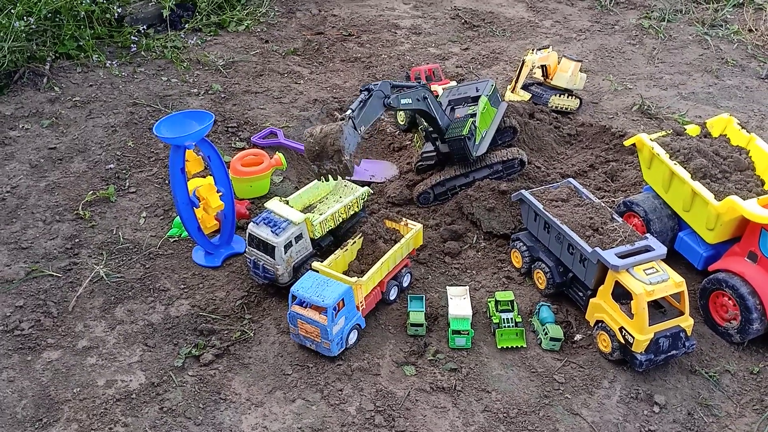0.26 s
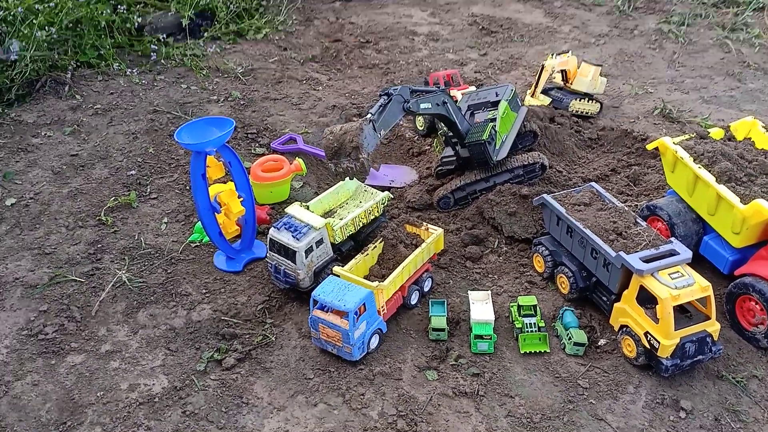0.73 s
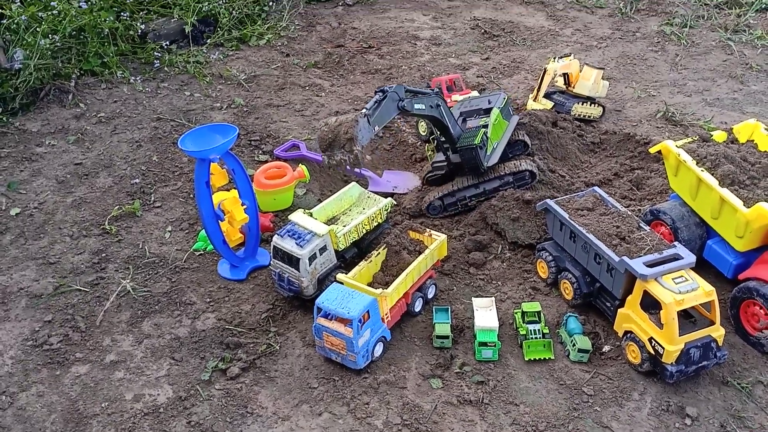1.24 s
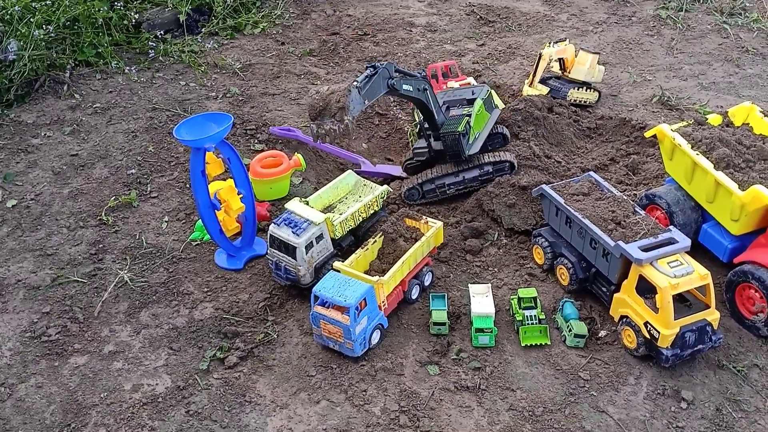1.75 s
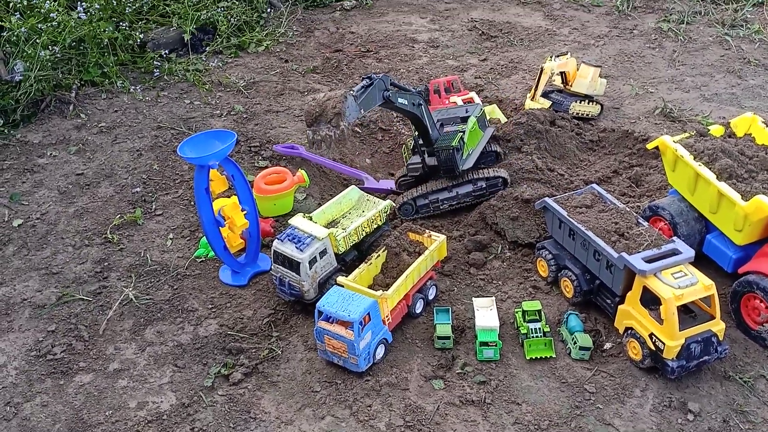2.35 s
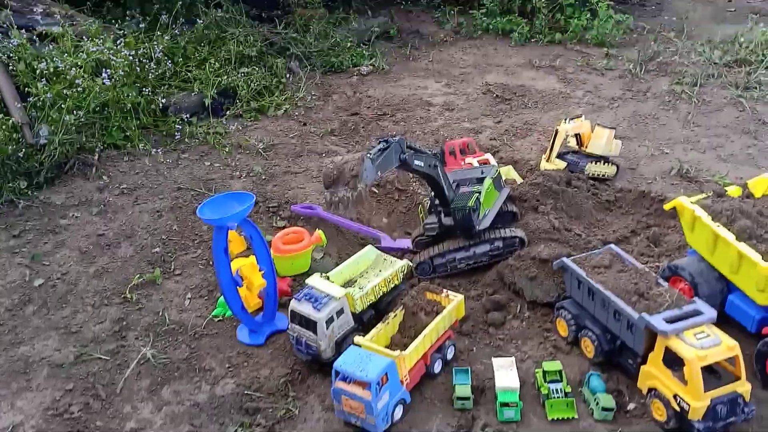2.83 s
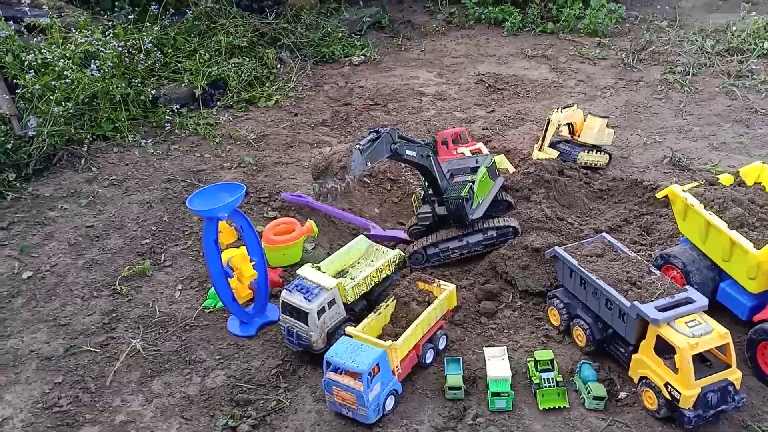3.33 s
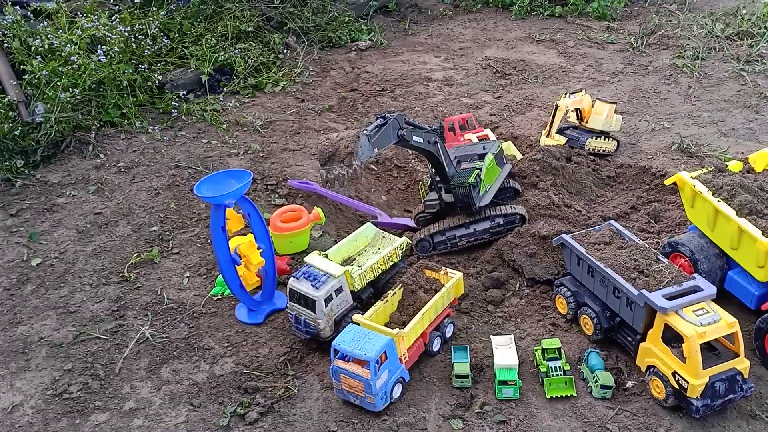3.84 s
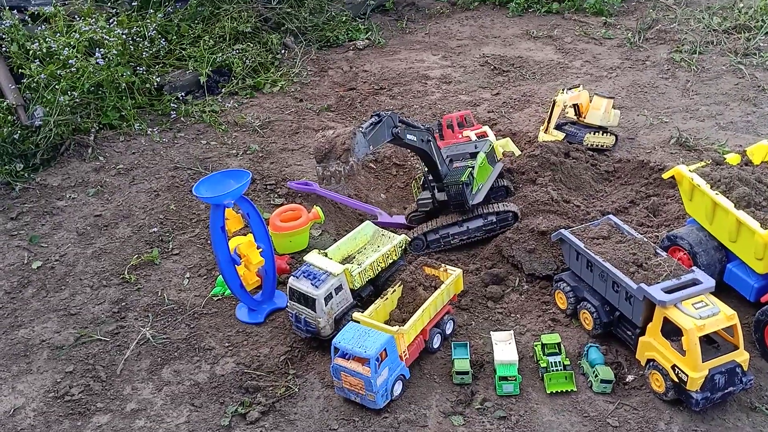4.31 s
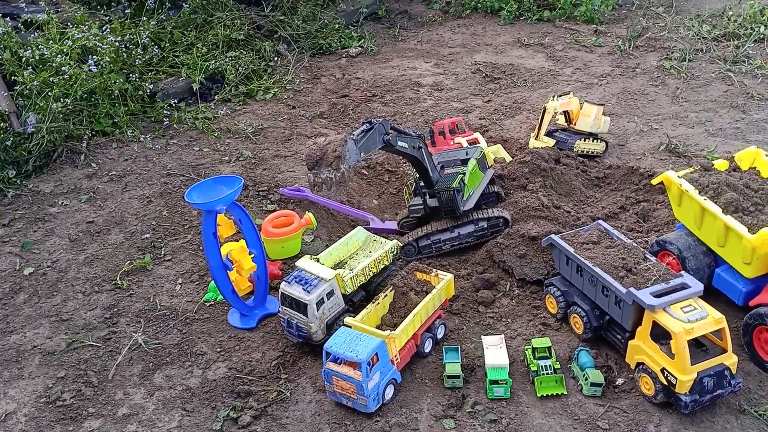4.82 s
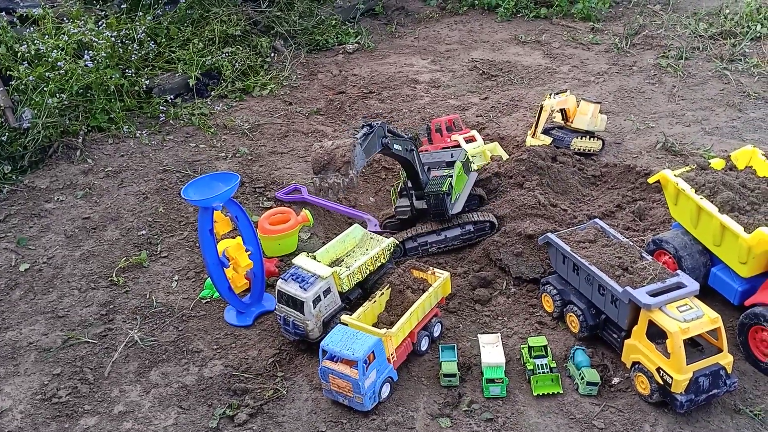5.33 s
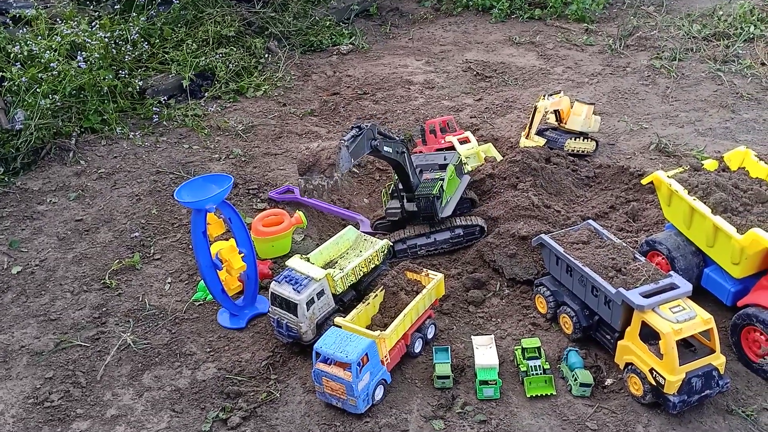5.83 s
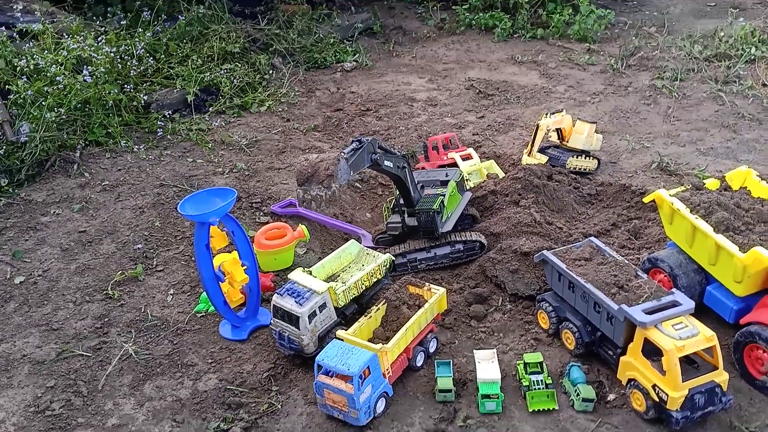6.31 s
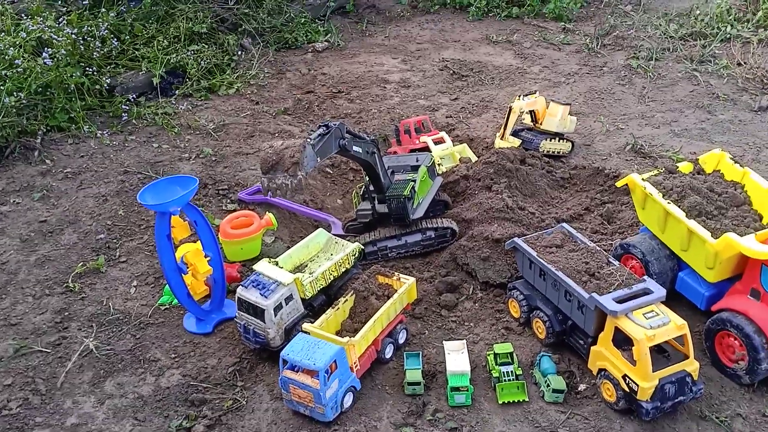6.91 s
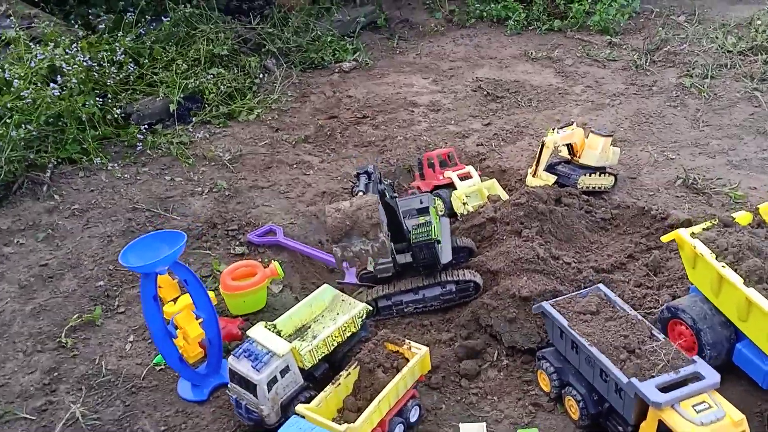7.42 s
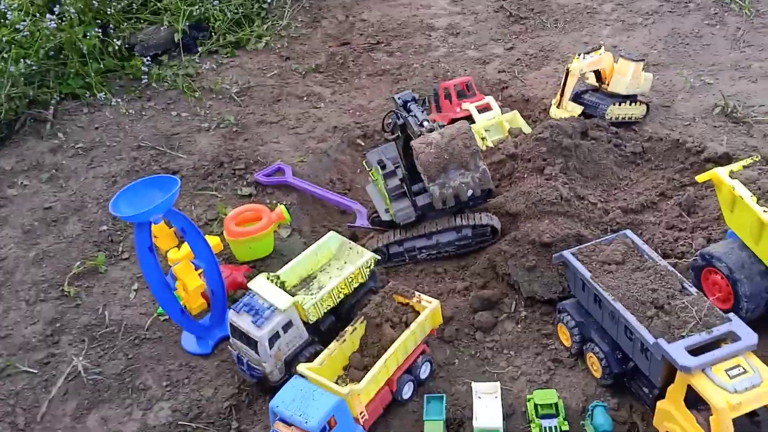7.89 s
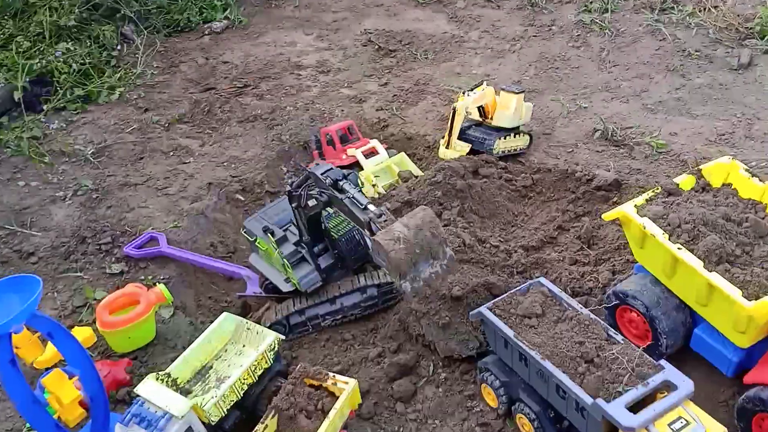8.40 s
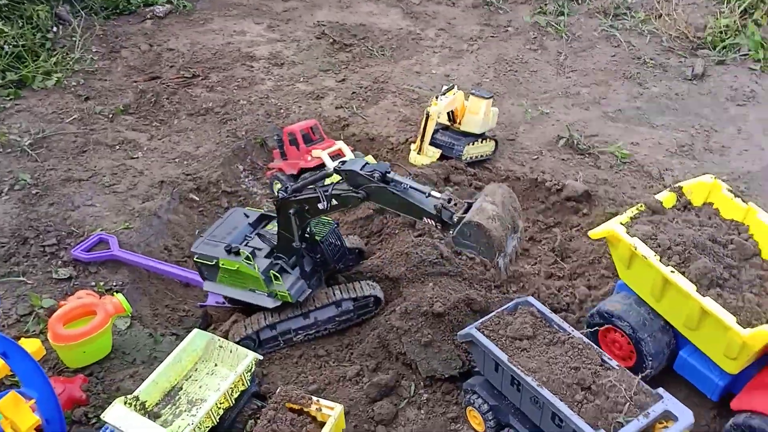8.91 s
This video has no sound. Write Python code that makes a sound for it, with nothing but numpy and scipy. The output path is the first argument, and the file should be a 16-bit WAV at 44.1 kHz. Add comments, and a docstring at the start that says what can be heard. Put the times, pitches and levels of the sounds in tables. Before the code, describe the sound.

Small electric motors with rattling plastic gears start and stop: a coarse grind winding down, several brief whirrs, a pause, then a longer grinding turn. The handheld stereo microphones pick up much louder, close thumps, raps, dry clicks and gritty finger rubs, stronger on the right. Behind it lie open air, thin high insect hiss, distant rumble and one very faint trickle of dirt.

```python
"""A toy excavator works in a dirt patch a few metres from two microphones in a hand-held plastic case.
Its small motors spin up and coast down: gear teeth whine at steady multiples of the motor speed, and
noise bursts that recur each shaft turn rattle the plastic housings; swelling noise makes one hard gear grind.
Dirt trickles as filtered noise. Fingers knock, click, scrape and rub on the case, loudest on the right: short
pushes ring its modes, grit adds noise. Insects hiss in two noise bands over airy hiss and a far rumble."""
import sys
import numpy as np
from scipy import signal
from scipy.fft import rfft, irfft
from scipy.io import wavfile
from scipy.ndimage import uniform_filter1d

SR = 44100
rng = np.random.default_rng(int(sys.argv[2]) if len(sys.argv) > 2 else 0)


def file_out(sig):
    """Save sig as 16-bit WAV at sys.argv[1]."""
    # one column per channel
    cols = np.atleast_2d(sig).T
    # limit, then scale
    lim = np.clip(cols, -1, 1)
    pcm = np.round(lim * 32767).astype(np.int16)
    wavfile.write(sys.argv[1], SR, pcm)


def elevation(decibels):
    """Turn decibel levels (scalar or array-like) into linear amplitude ratios."""
    levels = np.asarray(decibels, float)
    return 10 ** (levels / 20)


N = 403515
T = np.arange(N) / SR  # seconds
HZ = np.maximum(np.arange(N // 2 + 1) * SR / N, 1)  # frequency of each spectrum bin
SIDES = np.array([[1], [-1]])  # left, right


def colour(x, points, share=1):
    """Filter by a spectrum of (Hz, dB) points, joined on a log frequency axis."""
    hz, db = np.transpose(points)
    gain_db = np.interp(np.log(HZ), np.log(hz), db)
    return irfft(rfft(x) * elevation(share * gain_db), N)


def hump(hz, width):
    """Gain of a resonance over the spectrum, 1 at its centre."""
    return 1 / np.sqrt(1 + (2 * (HZ - hz) / width) ** 2)


def unit(x):
    """Scale to rms 1."""
    return x / np.sqrt(np.mean(x ** 2))


def walk(rate):
    """Random drift: levels held 1 / rate seconds, smoothed twice, rms 1."""
    hold = int(SR / rate)
    steps = np.repeat(rng.standard_normal(N // hold + 1), hold)
    smooth = uniform_filter1d(uniform_filter1d(steps, hold), hold)
    return unit(smooth[:N])


def hiss(alike):
    """Noise for two microphones; alike is the correlation between them."""
    mid, side = rng.standard_normal((2, N))
    return np.sqrt(1 + alike) * mid + SIDES * np.sqrt(1 - alike) * side


def curves(runs):
    """Join the runs in time; the first curve is 1 during a run and fades to 0 between them."""
    s, *columns = np.transpose(np.concatenate(runs))
    on = sum((T >= run[0][0]) & (T < run[-1][0]) for run in runs)
    gate = uniform_filter1d(1. * on, size=300, mode="nearest")
    return [gate] + [np.interp(T, s, column) for column in columns]


def ring(x, hz, t60):
    """One mode that decays 60 dB in t60 seconds, driven by x."""
    pole = np.exp(2j * np.pi * hz / SR - np.log(1000) / (t60 * SR))
    return signal.lfilter([1], [1, -pole], x).imag


def motor(runs):
    """Speed climbs towards its top under power, then friction brakes it evenly; also the run's level."""
    s, powered, top, rise, brake, db = np.array(runs).T[:, :, None]
    climb = top * (1 - np.exp(-np.clip(T - s, 0, powered) / rise))
    speeds = climb - brake * np.maximum(T - s - powered, 0)
    level_db = db[np.argmax(speeds, axis=0), 0]
    return np.maximum(np.max(speeds, axis=0), 0), uniform_filter1d(level_db, size=400)


def whine(hz, tones, waver, flutter_db):
    """Shaft and gear tones, locked to a slightly unsteady speed; each flutters alone in level."""
    turns = np.cumsum(hz * (1 + waver * walk(60))) / SR
    total = 0
    for multiple, db in tones:
        level = np.sqrt(2) * elevation(db + flutter_db * walk(40))
        total = total + level * np.sin(2 * np.pi * multiple * turns)
    return total


# Resonances of the housing panels.
# Each row: centre in Hz, width in Hz, boost (or cut, if negative) in dB at the centre.
PANEL_MODES = [(253, 54, 12), (1210, 340, -3), (2880, 130, 3), (6800, 430, -3)]


def panels(x):
    """Spectrum of x after the housing panels boost or cut what falls on their resonances."""
    gains = [1 + (elevation(db) - 1) * hump(hz, width) ** 2 for hz, width, db in PANEL_MODES]
    return rfft(x) * np.prod(gains, axis=0)


def rattle(shaft_hz, box, beat, grain_db, treble_gain):
    """Teeth clatter in uneven bursts, harder once a shaft turn; recurring flaws draw rough partials."""
    repeat_share, repeat_memory = .45, .94  # power share that recurs; how much of a flaw lasts a turn
    turns = np.cumsum(shaft_hz * (1 + .004 * walk(40))) / SR
    # one row of flaws per turn, each row mostly a copy of the one before
    flaws = rng.standard_normal((int(turns[-1]) + 1, 512))
    flaws = unit(signal.lfilter([1], [1, -repeat_memory], flaws, axis=0))
    again = flaws.ravel()[(turns * flaws.shape[1]).astype(int)]
    blows = np.sqrt(1 - repeat_share) * hiss(0.13) + np.sqrt(2 * repeat_share) * again
    blows = blows * elevation(grain_db * walk(500)) * (1 + beat * np.cos(2 * np.pi * turns))
    spectrum = panels(colour(blows, box))
    body = irfft(spectrum * (HZ < 3600), N)
    treble = irfft(spectrum * (HZ >= 3600), N)
    # rms 1 while the shaft turns, before the treble gain
    running = (body + treble)[:, shaft_hz > 100]
    return (body + treble * treble_gain) / np.sqrt(np.mean(running ** 2))


# Tones of the arm drives. Each row: multiple of the tooth rate, relative level in dB.
ARM_GEAR_TONES = [(.1, -6), (.285, -16), (.46, -11), (.615, -10), (1, -4), (1.6, -17), (2, -12), (3, -15)]
# Spectrum of the arm housing. Each row: frequency in Hz, relative level in dB per Hz.
ARM_HOUSING = [(300, -35.5), (850, -18.5), (1150, -6), (2830, -5), (4460, -14), (6920, -9), (8430, -26),
               (9230, -43.5), (15000, -41.5)]


def arm(runs, whine_db):
    """A ten-tooth pinion drives the reduction gears; faster is louder and brighter."""
    hz, db = motor(runs)
    pace = hz / 2400
    tones = whine(hz, ARM_GEAR_TONES, .007, 3)
    tones = elevation(db + whine_db) * np.clip(1.3 * pace - .2, 0, 1) * tones
    # the small housing radiates low tones poorly and muffles high ones
    tones = colour(tones, [(600, -26), (1300, 0), (3200, 0), (4500, -6.5)])
    tones = irfft(panels(tones), N)
    clatter = rattle(hz / 10, ARM_HOUSING, 0.12, 1.1, pace ** .5)
    return tones + elevation(db) * pace ** 1.045 * clatter


# Runs of the stick motor; the first row is another motor, already running, that soon coasts down.
# Each row: start in seconds, powered time in seconds, top speed in pinion teeth per second,
# spin-up time in seconds, braking in Hz per second, relative level in dB.
FIRST_MOTOR_AND_STICK_RUNS = [(-.3, 0.53, 2285, 0.046, 6955, -49), (.918, 0.24, 2406, 0.051, 9797, -40.5),
                              (1.36, 0.28, 2254, 0.047, 9723, -40), (1.745, .213, 2688, .078, 9690, -40),
                              (4.905, 0.36, 2449, 0.072, 11040, -43)]


def first_motor_and_stick():
    """Another motor coasts down, then the stick motor whines and clatters in short runs."""
    return arm(FIRST_MOTOR_AND_STICK_RUNS, 0.34)


# Runs of the boom motor. Each row: start in seconds, powered time in seconds, top speed in pinion teeth
# per second, spin-up time in seconds, braking in Hz per second, relative level in dB.
BOOM_RUNS = [(3.157, 0.15, 2350, 0.035, 15180, -43.5), (3.998, .16, 2507, 0.03, 12440, -44.5),
             (4.815, .41, 2162, .024, 13890, -44), (5.737, 0.26, 2500, 0.031, 13520, -41.5)]


def boom():
    """The boom motor drives the same kind of gears, with less whine against its clatter."""
    return arm(BOOM_RUNS, -2.0)


# Hum of the slewing motor, a list of rows per run.
# Each row: time in seconds, shaft speed in Hz, relative level in dB.
SLEW_HUM = [
    [(0, 284.3, -61), (.2, 278.8, -59), (.33, 229, -71)],
    [(6.95, 235, -73.5), (7.3, 259.1, -74.5), (7.75, 278.4, -65.5), (8.06, 250.8, -69), (8.3, 267.6, -75),
     (8.8, 279.6, -71.5), (9.15, 264.8, -92)],
]
# Tones of that hum. Each row: multiple of the shaft speed, relative level in dB.
SLEW_HUM_TONES = [(1, -4), (2, -2), (4.1, 2), (5.8, 1), (9.4, 0)]
# Grind of the slewing and lifting gears, a list of rows per run.
# Each row: time in seconds, level in dB before the treble fades.
GEAR_GRIND = [
    [(0, -45), (.3, -44), (.5, -49), (.86, -61.5), (.89, -70)],
    [(6.93, -62), (7.01, -55), (7.8, -51), (8.4, -45.5), (8.7, -48), (8.92, -49), (9.15, -54)],
]
# Spectrum of the slewing housing. Each row: frequency in Hz, relative level in dB per Hz.
SLEW_HOUSING = [(260, -22), (450, -20), (1090, -1.5), (1710, -11.5), (2040, -5), (3510, -7), (4370, -17),
                (6790, -7.5), (8980, -30), (15000, -47.5)]


def slew():
    """The body turns: a low hum in a grind that swells and then sinks, its treble fading late in the turn."""
    turn_from_s, dulling_db_per_s = 7.61, -5
    on, hz, hum_db = curves(SLEW_HUM)
    grinding, grind_db = curves(GEAR_GRIND)
    hum = whine(hz * (1 + .015 * walk(8)), SLEW_HUM_TONES, .018, 5)
    treble_gain = elevation(dulling_db_per_s * np.maximum(T - turn_from_s, 0))
    grind = rattle(hz, SLEW_HOUSING, .15, 2, treble_gain)
    return on * elevation(hum_db) * hum + grinding * elevation(grind_db) * grind


# Runs of the lifting motor. Each row: start in seconds, powered time in seconds, top speed in shaft turns
# per second, spin-up time in seconds, braking in Hz per second, relative level in dB.
LIFT_RUNS = [(-.5, .83, 394, 0.051, 639.4, -60), (7.97, .6, 398.4, .045, 514.5, -52)]
# Shaft hum, then gear mesh. Each row: multiple of the shaft speed, relative level in dB.
LIFT_HUM_AND_MESH = [(1, -3), (9.0, -4.5)]


def lift():
    """A lightly loaded motor: clean shaft hum and a thin mesh tone that fades as it slows."""
    hz, db = motor(LIFT_RUNS)
    pace = hz / 400
    # the hum is silent below 0.58 of full pace
    hum = np.clip(pace - .58, 0, 1) ** 0.051 * pace * whine(hz, LIFT_HUM_AND_MESH[:1], 0.0044, 2.9)
    mesh = pace ** 8 * whine(hz, LIFT_HUM_AND_MESH[1:], 0.0019, 2.4)
    return irfft(panels(elevation(db) * (hum + mesh)), N)


def soil():
    """Loose dirt trickles from the bucket: a band of noise that swells briefly and dies away."""
    fall = (T > 6.12) * np.exp(-np.abs(T - 6.2) / 0.15)
    grains = irfft(rfft(hiss(0.43)) * hump(2770, 710) ** 2, N)
    return elevation(-69.0) * fall * unit(grains)


# Knocks on the case.
# Each row: start in seconds, relative thump level in dB, rap in dB relative to the thump.
CASE_KNOCKS = [(.175, -17, -5), (.187, -24.5, -18), (0.236, -33.5, 18), (0.24, -26.5, 18),
               (0.586, -39.5, 3), (0.695, -51, 17.5), (.806, -25.5, 2.5), (.848, -32.5, -1),
               (1.207, -24.5, 2.5), (1.05, -37.5, -10), (1.476, -38, -21), (1.667, -27.5, 5),
               (2.574, -47.5, 10.5), (2.792, -51, 4), (2.985, -47.5, 7), (3.027, -37.5, 4.5),
               (3.889, -28.5, -2), (3.918, -43.5, -2), (3.965, -46.5, -5), (4.075, -33, -4.5),
               (4.767, -29.5, -2.5), (5.155, -35.5, 1), (5.577, -37, -3), (6.357, -51.5, -5),
               (6.48, -55, 0), (6.647, -49.5, 10), (6.678, -43, 14), (6.775, -65.5, 12.5),
               (7.131, -43.5, -3), (7.527, -46.5, 15.5), (7.689, -46.5, 17), (7.85, -26, 3),
               (7.874, -19.5, -1.5), (8.388, -24, 4), (8.751, -21.5, -6), (9.053, -39, 5)]


def knock_force():
    """Each knock is one slow push that thumps and a short rough one that raps."""
    force = np.zeros((2, N))
    t = np.arange(600) / SR
    for s, db, rap_db in CASE_KNOCKS:
        at = slice(int(s * SR), int(s * SR) + 600)
        rough = 1 + .5 * rng.standard_normal(600)
        force[0, at] += elevation(db - 44.0) * np.sin(2 * np.pi * np.minimum(t / .005, 1))
        rap = rough * np.cos(2 * np.pi * 700 * t) * np.exp(-t / 0.00086)
        force[1, at] += elevation(db + rap_db - 23.5) * rap
    return force


# Dry clicks of a nail or button, and one (at 7.003 s) as the gears start to grind.
# Each row: start in seconds, relative level in dB, ringing in Hz.
DRY_CLICKS = [(.234, -21, 5770), (.384, -26.5, 5720), (2.552, -48, 2510), (2.657, -53, 2720),
              (2.905, -39.5, 2340), (2.987, -37.5, 2700), (3.785, -37.5, 2740), (4.565, -47.5, 2660),
              (5.491, -37, 3118), (5.575, -28.5, 2321), (7.003, -37, 2300), (7.849, -19.5, 1530)]


def clicks():
    """Dry clicks, and the faint tick in every knock: decaying grit with a little ringing."""
    ticks = np.zeros(N)
    t = np.arange(600) / SR
    knock_ticks = [(s, db - 11.5, 1600) for s, db, _ in CASE_KNOCKS]
    for s, db, hz in DRY_CLICKS + knock_ticks:
        grit = rng.standard_normal(600)
        click = (grit + ring(grit, hz, 0.0058) / 4) * np.exp(-t / 0.0049)
        ticks[int(s * SR):int(s * SR) + 600] += elevation(db - 7.5) * click
    return ticks


# Short scrapes: the first a hard grind of gears, the others on the case.
# Each row: start in seconds, length in seconds, relative level in dB, ringing in Hz.
SHORT_SCRAPES = [(0.439, .055, -36, 6070), (5.513, .06, -51, 1187), (5.594, 0.049, -65.5, 1230)]


def scrapes():
    """Ringing noise that swells over a third of its length, holds and stops dead."""
    total = np.zeros(N)
    rough = rng.standard_normal(N)
    for s, length, db, hz in SHORT_SCRAPES:
        swell = np.clip(3 * (T - s) / length, 0, 1) * (T < s + length)
        total += elevation(db) * swell * (rough + ring(rough, hz, 0.004) / 2)
    return total


# Fingers sliding on the case.
# Each row: start in seconds, length in seconds, slips per second, relative level in dB.
FINGER_RUBS = [(2.182, 0.13, 56, -49), (2.569, 0.086, 54.5, -44), (2.832, 0.15, 60.4, -42.5),
               (3.542, 0.046, 103, -45), (7.292, 0.3, 48, -48), (7.395, 0.1, 273, -35),
               (8.297, 0.084, 56, -42.5)]


def rubbing():
    """A stream of small decaying slips, eased off at the end; gives force on the case and loose grit."""
    smooth, gritty = np.zeros((2, N))
    wobble, rough = walk(60), rng.standard_normal(N)
    for s, length, rate, db in FINGER_RUBS:
        pressure = elevation(db) * (T > s) * np.clip(3 * (1 - (T - s) / length), 0, 1)
        slip = pressure * np.exp(-((rate * T + .25 * wobble) % 1) / .5)
        # fast slips are smooth and make the case groan; slow ones are gritty
        smooth += slip
        gritty += slip * (50 / rate) ** 2
    groan = elevation(-38 + 3.8 * walk(200)) * smooth
    scratch = elevation(-49) * gritty * ring(rough, 670, .02)
    return np.array([groan, scratch]), elevation(-19) * gritty * rough


# Modes of the case; under 500 Hz they thump, above it they rap.
# Each row: frequency in Hz, relative level in dB, 60 dB decay time in seconds.
CASE_MODES = [(210, -8.5, 0.079), (264.6, 5, 0.054), (383, -8, 0.27), (669, -12, 0.043), (820, -15, 0.023),
              (1050, -3.5, 0.012), (1423, -8.5, 0.012)]


def case(force):
    """The thumping and the rapping modes, driven by their own forces."""
    return sum(elevation(db) * ring(force[int(hz > 500)], hz, t60) for hz, db, t60 in CASE_MODES)


def knocks_and_grit():
    """Pushes ring the case while clicks, scrapes and grit sound directly; all louder on the right."""
    rub_force, rub_grit = rubbing()
    ticks = clicks() + scrapes() + rub_grit
    grit = colour(ticks, [(250, -35.5), (800, -3.5), (1600, -2.5), (6500, -5.0), (9000, -45.0)])
    body = colour(case(knock_force() + rub_force), [(50, -40.5), (160, -4.5)])
    body = body * elevation(-4.5 * SIDES)
    # the shell carries the blow to the left port 14 samples sooner
    body[1] = np.roll(body[1], 14)
    return body + grit * elevation(-1.0 * SIDES)


# Insect choruses. Each row: centre in Hz, width in Hz, level in dB.
INSECT_BANDS = [(4714, 540, -80.5), (6350, 610, -72.5)]


def insects():
    """Bands of noise, each slowly wavering in level."""
    total = 0
    for hz, width, db in INSECT_BANDS:
        band = irfft(rfft(hiss(0.043)) * hump(hz, width) ** 2, N)
        total = total + elevation(db + 0.4 * walk(1.7)) * unit(band)
    return total


# Spectrum of the open air. Each row: frequency in Hz, relative level in dB per Hz.
AIR_SPECTRUM = [(18, -44), (34, -21.5), (116, -4.5), (279, -22.5), (2800, -33.5), (3700, -38), (5200, -78)]


def air():
    """Far drifting rumble, nearly the same in both microphones, under a wide airy hiss."""
    low = irfft(rfft(colour(hiss(.85), AIR_SPECTRUM)) * (HZ < 170), N)
    low = low * elevation(2.5 * walk(2))
    high = irfft(rfft(colour(hiss(0.058), AIR_SPECTRUM)) * (HZ >= 170) * (HZ < 9000), N)
    return elevation(-69.5) * unit(low + high)


def scene():
    """Motors at a distance, knocks and grit, open air."""
    motors = first_motor_and_stick() + boom() + slew() + lift()
    return motors + soil() + knocks_and_grit() + insects() + air()


def top_cut(x):
    """Nothing passes above the cut-off."""
    return signal.sosfilt(signal.butter(12, 15550, fs=SR, output="sos"), x)


# Left minus right of the two microphones. Each row: frequency in Hz, difference in dB.
PORT_DIFFERENCE = [(60, 0.5), (400, -2), (4000, -5), (15000, 9.5)]


def record(dry):
    """The two microphones differ in colour, half of the difference on each side."""
    left = colour(dry[0], PORT_DIFFERENCE, .5)
    right = colour(dry[1], PORT_DIFFERENCE, -.5)
    return top_cut(np.array([left, right]))


dry = scene()
out = record(dry)
file_out(out)
```